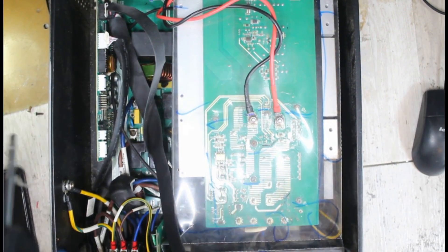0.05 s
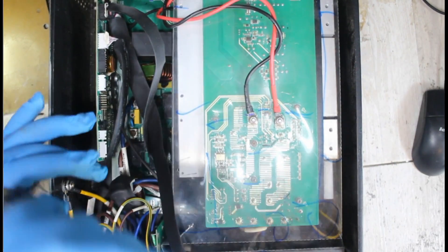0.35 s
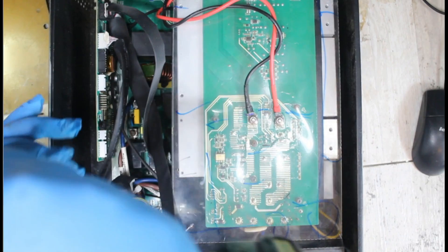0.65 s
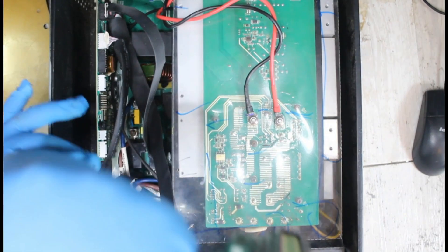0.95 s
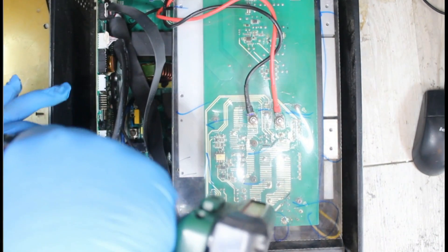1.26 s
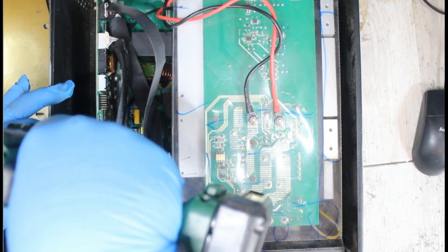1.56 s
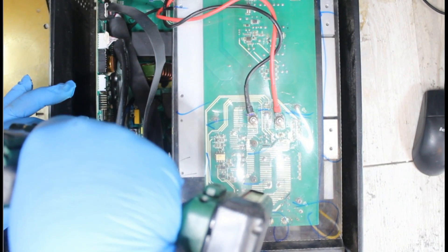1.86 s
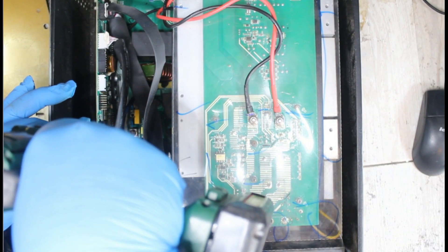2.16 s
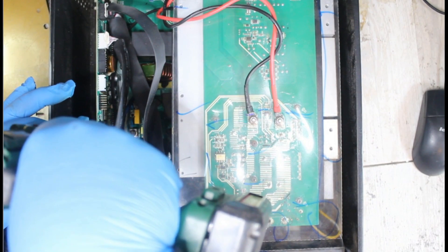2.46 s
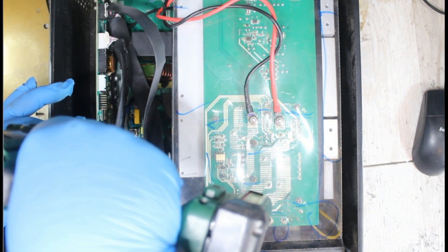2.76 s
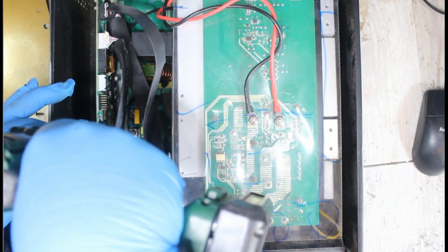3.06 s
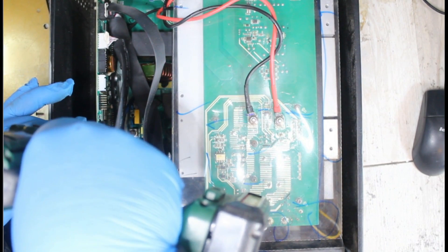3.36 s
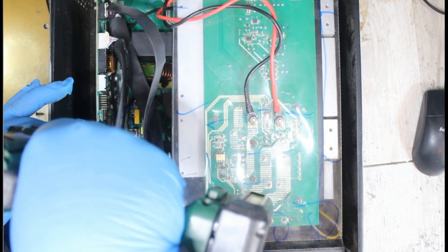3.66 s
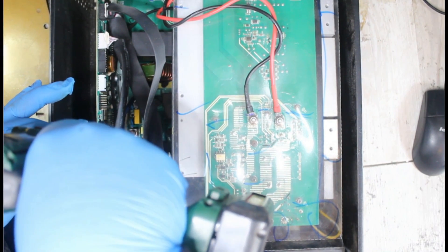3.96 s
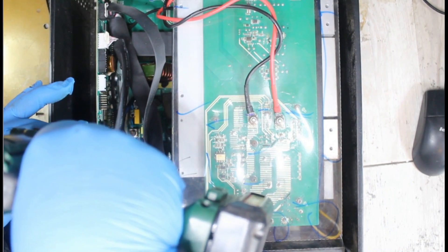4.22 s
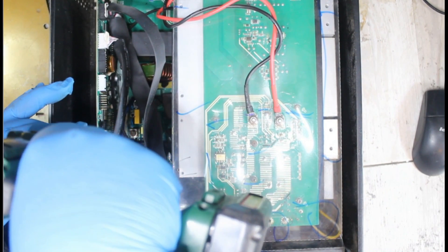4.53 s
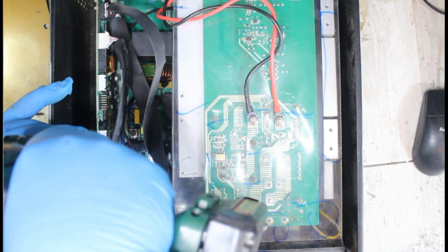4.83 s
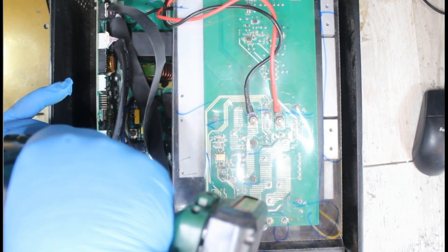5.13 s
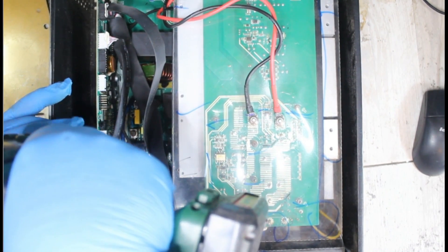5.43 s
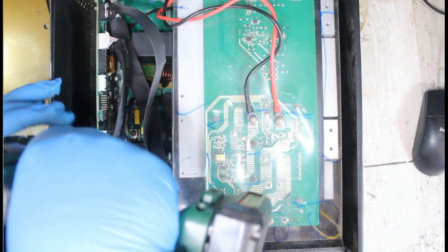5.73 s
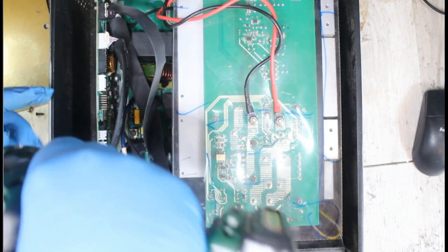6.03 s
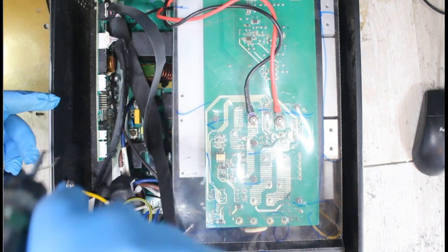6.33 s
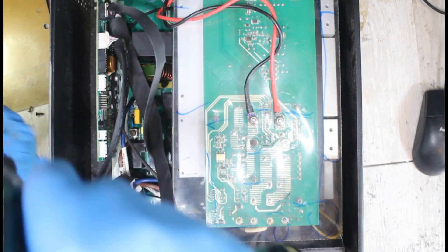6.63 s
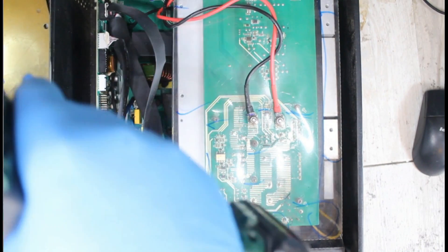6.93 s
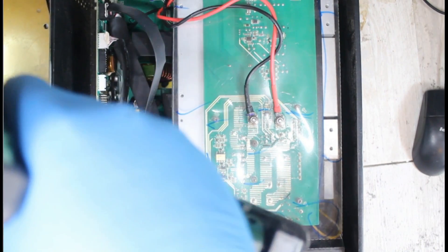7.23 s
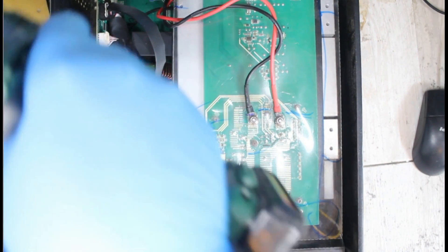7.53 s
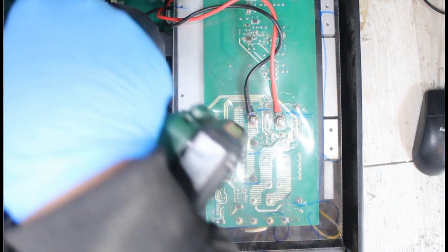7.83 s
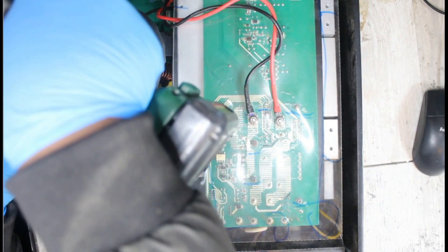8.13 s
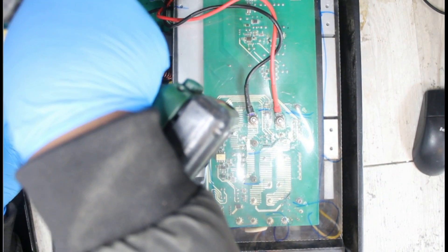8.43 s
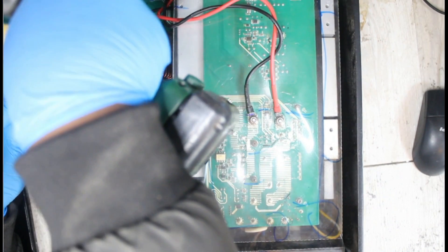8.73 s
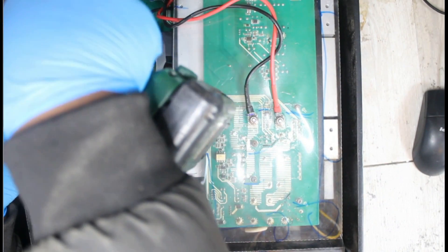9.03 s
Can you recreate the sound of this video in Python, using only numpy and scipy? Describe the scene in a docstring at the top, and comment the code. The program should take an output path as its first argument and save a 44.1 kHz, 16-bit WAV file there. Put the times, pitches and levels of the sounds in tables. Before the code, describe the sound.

A faint fan and mains hum fills a workshop, with a stereo microphone close above an open metal case. At about 0.3 seconds a cordless screwdriver thuds on the bench with sharp metallic clicks. Its bit taps and the case knocks between 1 and 1.8 seconds. The sound drops out briefly near 2.2, and more knocks come around 3.2 and 3.8. From 3.3 the stalled motor gives a faint, high whistle. At 4.6 a screw squeaks loose and the gears crawl, with a loud knock at 4.8. The motor races into a bright whirr at 4.9, the screw rattling, with a sharp click at 5.5, then brakes at 5.8. Light clicks and bumps follow. At 8.7 the motor crawls again, with sharp clicks and a squeak, speeding up just after 9 and whirring to the end.

```python
"""Workshop, faint hum; a small stereo microphone hangs close above an open metal case on the bench.
A cordless screwdriver bumps the bench, its bit clicks on screws and the case thumps; near 2.2 s the
sound drops out briefly. From 3.3 s a half-pressed trigger makes the stalled motor whistle. The screw
squeaks loose and rattles as the motor crawls, races up with a bright gear whirr and is braked.
A few light clicks and bumps follow, then a second pull at 8.7 s runs to the end."""
import sys
import numpy as np
from scipy import signal
from scipy.fft import rfft, irfft
from scipy.io import wavfile

SR = 44100
rng = np.random.default_rng(int(sys.argv[2]) if len(sys.argv) > 2 else 0)


def inscribe(sig):
    """Save sig as 16-bit PCM at rate SR to the path in sys.argv[1].

    A 1-D sig is mono; a 2-D sig holds one channel per row.
    Samples are clipped to [-1, 1] before scaling.
    """
    pcm = np.round(np.clip(np.atleast_2d(sig).T, -1, 1) * 32767)
    wavfile.write(sys.argv[1], SR, pcm.astype(np.int16))


N = 409248
T = np.arange(N) / SR
FREQS = np.fft.rfftfreq(N, 1 / SR)

# trigger pulls: (touched [s], screw loose [s], pressed home [s], eased off [s], gear take-up [s],
# gear level [dB], treble [dB], whistle dip [Hz])
TRIGGER_PULLS = [(3.265, 4.631, 4.918, 5.705, 0.075, -13, 2.5, 605),
                 (8.715, 8.742, 9.056, 9.6, 0.27, -11, 0.5, 516)]
# strong gear and commutator tones: (multiple of the shaft rate [-], boost at top speed [dB])
GEAR_TONES = [(1, 9), (3, 7), (6, 5), (9, 15), (12, 6), (16, 10), (18, 11), (19, 9), (26, 6), (28, 6),
              (30, 9), (31, 9), (33, 10), (35, 9), (37, 16), (38, 11), (39, 7), (43, 13), (45, 7)]
# gear housing response, then its treble band: (frequency [Hz], level [dB])
HOUSING_COLOUR = [(150, -22), (330, -8), (600, -3.5), (1100, -1), (1800, -1.5), (2800, 1), (4000, -4.5),
                  (5400, 2), (7800, -5), (10000, 0.5), (11500, 3), (13000, 5), (14100, 2), (15300, 3.5)]
TREBLE_BAND = [(3000, -40), (5500, -8), (10000, 0)]
# first three harmonics of the whistle: (stalled level [dB], loaded level [dB])
WHISTLE_HARMONICS = [(-6.5, 4), (-9.5, 2), (3, -7)]
# the loose screw catches in its hole: (time [s], level [dB])
SCREW_CATCHES = [(4.958, -23), (5.084, -28.5), (5.242, -29), (5.32, -27.5), (5.51, -17.5), (5.594, -20.5),
                 (5.68, -18), (5.735, -33), (5.806, -25), (9.09, -28.5)]
# the tight thread squeaks: (time [s], pitch [Hz], glide [Hz/s], level [dB])
THREAD_SQUEAKS = [(4.645, 3200, 14000, -30), (4.687, 3160, -5000, -23.5), (4.935, 3240, 0, -23.5),
                  (8.957, 2780, 2, -26)]
# blows on the case: (time [s], level [dB], thump offset [dB], tick offset [dB])
CASE_KNOCKS = [(0.2723, -10, -13.5, -13), (1.523, -22, -1.5, -16), (1.592, -25, -15, -10),
               (1.737, -24.5, -0.5, -26), (1.799, -12.5, -7, -16.5), (2.924, -31.5, 5, -31),
               (2.961, -32.5, -0.5, -17), (3.08, -28.5, -0.5, -43), (3.159, -29, 8.5, -33),
               (3.197, -9, -3.5, -15.5), (3.221, -16, 2.5, -11), (3.792, -14.5, -3.5, -17.5),
               (3.932, -27.5, 2, -32), (4.237, -27, -1, -17), (4.793, -3, -5, -3.5), (4.806, -13, -11, 0),
               (5.504, -11.5, -9, 2), (8.306, -30, 4, -28), (8.371, -34, -2, -26), (8.525, -33.5, 3.5, -18),
               (8.913, -17, -5, 0), (8.954, -16, -13, 4.5)]
# bit on screw: (time [s], level [dB], ring [Hz], ring offset [dB], body offset [dB], t60 [s])
BIT_CLICKS = [(0.236, -6.5, 13500, -1, -9, 0.059), (0.2441, 0.5, 11600, -4.5, -8, .02),
              (0.25, -9, 12100, 0, -4, 0.043), (0.274, -10, 13000, -7, -0.5, .03),
              (0.299, -3, 11840, -2, -7.5, 0.089), (0.456, -23, 4400, -1, -6, .013),
              (1.071, -23.5, 4550, 9, 0, 0.042), (2.634, -20.5, 2600, -9, 0, 0.031),
              (3.669, -36.5, 1460, -1, 6.5, .06), (4.633, -24, 2720, -1, -10, 0.063),
              (6.286, -45, 2400, 3, 12.5, 0.065), (7.191, -29.5, 1570, -7, 3, 0.089),
              (7.26, -26, 2470, -8, 2.5, 0.11), (7.647, -47, 2020, 3.5, 11, 0.45),
              (8.623, -42.5, 2520, 3.5, 3, .07), (8.735, -32, 3100, -9, -1, 0.088),
              (8.915, -15, 3340, 3, -2, 0.21), (8.953, -11, 2670, -2.5, -27, .074)]
# dull bumps on the bench: (time [s], level [dB], knock offset [dB])
BENCH_THUDS = [(.2505, -12.5, -6), (0.2569, -5.5, 7.5), (0.2677, -9.5, 1), (0.301, -21, -22),
               (0.45, -28.5, -18)]
# modes of the struck parts: (frequency [Hz], level [dB], t60 [s])
BRACKET_MODES = [(114, 0, 0.1), (206, -13.5, 0.25), (330, -9, 0.21), (373.4, 0.5, 0.11), (558, 4, 0.036),
                 (1140, -8, 0.043)]
PANEL_MODES = [(115.3, -4.5, 0.47), (133, -7, 0.2), (200.2, -10, .2), (369.3, -10.5, 0.12)]
FRAME_MODES = [(392, -0.5, 0.1), (558.5, 2.5, 0.14), (628, 3, 0.08), (766, -17, 0.03), (937, -13, 0.11),
               (1185, -6, 0.16), (1299, 4.5, 0.037), (1840, -29, .06), (2110, -9, 0.064),
               (2440, -26.5, .09), (2910, -8, 0.051), (3530, -34, 0.028)]
BENCH_MODES = [(31.2, -11, 1), (58.5, -10, 0.33), (115, -3.5, 0.22), (196, 1, 0.163), (250, -12.5, 0.054)]
BENCH_KNOCK_MODES = [(388, 0, .12), (420, -5, .07), (705, -17, .07), (1150, -14, .07), (1405, -14, .06)]
# loose parts, metal tick, panel rumble, room tail and room air: (frequency [Hz], level [dB])
RATTLE_COLOUR = [(150, -26.5), (400, 6.5), (1300, 5.5), (2400, -4.5), (4000, -4.5), (8000, -38),
                 (16000, -16)]
TICK_COLOUR = [(500, -28), (2000, 1.5), (4000, 3.5), (8000, 3.5), (12500, -2.5), (16000, -19)]
RUMBLE_COLOUR = [(30, 4), (80, 9), (130, 7.5), (220, 5.5), (300, -20), (600, -28)]
TAIL_COLOUR = [(150, -26), (700, 8.5), (5000, 4.5), (15000, 1.5)]
AIR_COLOUR = [(12, -56), (20, -7), (56, -5.5), (70, -5.5), (166, -14), (225, -16.5), (315, -18.5),
              (352, -20.5), (393, -8), (427, -15), (491, -13), (534, -24.5), (788, -22), (1540, -32.5),
              (15500, -36.5)]
# fan and mains hum: (frequency [Hz], level [dB])
HUM_TONES = [(48.4, -43), (161.5, -50.5), (199.2, -63.5), (387.6, -49), (473.7, -70), (780.6, -64),
             (947.5, -66.5)]
# how alike the microphone's two ports hear close work and room air: (frequency [Hz], likeness [0-1])
CLOSE_LIKENESS = [(100, .9), (400, 0.7), (900, 0.77), (2500, 1), (6000, 0.1), (14000, .05)]
ROOM_LIKENESS = [(100, 0.62), (400, 0.8), (900, 0.63), (2500, 0.081), (6000, 0.01), (14000, 0.028)]
# microphone balance: (frequency [Hz], left minus right [dB])
MIC_BALANCE = [(25, 17), (60, 8), (125, 6), (400, 1.5), (1000, 1.5), (2500, -0.5), (6000, -0.2),
               (13000, 2.5)]
# the sound drops out briefly: (time [s], level [dB])
LEVEL_DIP = [(2.15, -7), (2.2, -13.5), (2.24, -24), (2.26, -54), (2.3, -45), (2.318, -5)]

CRAWL_HZ, TOP_SPEED_HZ = 101, 345.9  # shaft rates
CHOP_HZ, SAG_HZ, LOAD_S, DIP_S = 3950, 238, .02, .039  # the trigger's current chopper
STALLED_DB, STALL_SWELL_DB, LOADED_DB, CHOP_FADE_DB_PER_S = -52, 6, -40, 497


def screwdriver(freeing_db_per_s=2, brake_after_s=.098, brake_db_per_s=442):
    """Close up: the stalled motor whistles, the gears grow louder as the screw frees, the brake bites."""
    out = np.zeros((2, N))
    for touched, loose, home, eased, take_up_s, db, treble_db, dip_hz in TRIGGER_PULLS:
        t = touched + np.arange(3 * SR) / SR
        freeing_db = freeing_db_per_s * np.maximum(t - home, 0)
        braking_db = brake_db_per_s * np.maximum(t - eased - brake_after_s, 0)
        drive = rise(t - loose, take_up_s) * undb(db + freeing_db - braking_db)
        whirr = gears(t, motor_speed(t, home, eased), treble_db)
        add(out, touched, drive * whirr + trigger_whistle(t, touched, loose, home, dip_hz))
    return out


def motor_speed(t, home, eased, race_s=.045, creep_s=.135, creep_share=.14, slowing_hz_per_s2=4000):
    """Turns per second: a crawl, a race, a last creep to top speed; eased off, it slows ever faster."""
    race = (1 - creep_share) * rise(t - home, race_s) + creep_share * rise(t - home, creep_s)
    slowing = slowing_hz_per_s2 * np.maximum(t - eased, 0) ** 2
    return CRAWL_HZ + np.maximum((TOP_SPEED_HZ - CRAWL_HZ) * race - slowing, 0)


def gears(t, hz, treble_db, louder_db_per_octave=3.5, brighter_db_per_octave=2.3):
    """Teeth sing and rattle in the housing, louder and brighter with each doubling of speed."""
    speed = hz / TOP_SPEED_HZ
    wobble = .00062 + .0132 * (1 - speed)  # a crawling motor turns less evenly
    turn = phase_of(hz * (1 + wobble * walk(140, t)))
    impacts = rng.standard_normal((2, len(t)))
    impacts *= undb(2.5 * np.repeat(rng.standard_normal(len(t) // 8 + 1), 8)[:len(t)])  # fine grain
    impacts *= (1 + .4 * np.sin(turn)) * undb(walk(60, t))  # stronger on one side of each turn
    whine = gear_whine(t, turn, speed)
    teeth = unit(colour(pair(impacts, CLOSE_LIKENESS), HOUSING_COLOUR))
    whirr = undb(-.5) * whine + undb(.14) * teeth
    octaves = np.log2(speed)
    treble_gain = undb(treble_db + brighter_db_per_octave * octaves)
    return undb(louder_db_per_octave * octaves) * (whirr + (treble_gain - 1) * colour(whirr, TREBLE_BAND))


def gear_whine(t, turn, speed, flutter_db=4, path_spread_rad=.27):
    """Multiples of the shaft rate fade in above half speed; near full speed some stand out."""
    on = speed > .4
    boost_db = dict(GEAR_TONES)
    tones, power = np.zeros((2, len(t))), 0
    for multiple in range(1, 48):
        gain = undb(boost_db.get(multiple, 0) * speed[on] ** 8)
        power = power + gain ** 2
        # each tone reaches the two ports by slightly different paths
        phase = 2 * np.pi * rng.random() + path_spread_rad * rng.standard_normal((2, 1))
        tones[:, on] += gain * undb(flutter_db * walk(24, t[on])) * np.sin(multiple * turn[on] + phase)
    tones[:, on] /= np.sqrt(power)
    tones = colour(tones, HOUSING_COLOUR)
    return tones / np.sqrt(np.mean(tones[:, on] ** 2)) * np.clip(2 * speed - 1, 0, 1)


def trigger_whistle(t, touched, loose, home, dip_hz, flutter_db=3):
    """Windings whistle at the chopping rate, sag and roughen under load, and fade with the trigger home."""
    load = rise(t - loose, LOAD_S)
    hz = CHOP_HZ - load * (SAG_HZ + dip_hz * (1 - rise(t - loose, DIP_S)))
    squeeze = np.sqrt(np.abs(np.sin(np.pi * np.clip((t - touched) / (loose - touched), 0, 1))))
    db = STALLED_DB + STALL_SWELL_DB * squeeze + load * (LOADED_DB - STALLED_DB)
    db -= CHOP_FADE_DB_PER_S * np.maximum(t - home, 0)
    jitter = .0003 + .025 * load
    phase = phase_of(hz * (1 + jitter * walk(700, t)))
    tone = 0
    for harmonic, (stalled_db, loaded_db) in enumerate(WHISTLE_HARMONICS, 1):
        shift_db = load * (loaded_db - stalled_db + flutter_db * walk(70, t))
        tone += undb(stalled_db + shift_db) * np.sin(harmonic * phase)
    return np.sqrt(2) * undb(db) * rise(t - touched, LOAD_S) * tone


def screw_rattle(rattle_db=-5, swell_s=.016, t60=.2):
    """The spinning screw skips on its thread and shakes its bracket each time it catches."""
    t = np.arange(SR // 4) / SR
    skips = rng.standard_normal(N) * (rng.random(N) < 500 / SR)  # about 500 a second
    bracket = unit(signal.fftconvolve(skips, ring(BRACKET_MODES, t))[:N])
    grip = sum(undb(db) * (1 - rise(at - T, swell_s)) * fade(np.clip(T - at, 0, 1), t60)
               for at, db in SCREW_CATCHES)
    return (bracket + undb(rattle_db) * noise(RATTLE_COLOUR, N)) * grip


def thread_squeaks(width_s=.0096, jitter=.019):
    """The thread sticks and slips in a short, rough chirp."""
    out, t = np.zeros((2, N)), np.arange(-SR // 20, SR // 20) / SR
    for at, hz, glide, db in THREAD_SQUEAKS:
        phase = phase_of((hz + glide * t) * (1 + jitter * walk(592, t - t[0])))
        add(out, at + t[0], np.sqrt(2) * undb(db) * np.exp(-(t / width_s) ** 2) * np.sin(phase))
    return out


def case_knocks(contact_s=.00077, swell_s=.0076):
    """The tool bumps the case: a tick, the frame clacks, loose parts rattle, the wide panel thumps."""
    out, t = np.zeros((2, N)), np.arange(SR // 2) / SR
    swell = rise(t, swell_s)
    for start, db, thump_db, tick_db in CASE_KNOCKS:
        contact = rise(t, contact_s * 2 ** (-tick_db / 9.5))  # less tick: a softer, longer contact
        rumble = peak(noise(RUMBLE_COLOUR, len(t)) * fade(t, t60=.45) * swell)
        thump = peak(ring(PANEL_MODES, t, detune=.023) * swell) + undb(-7) * rumble
        clack = peak(ring(FRAME_MODES, t) * contact)
        rattle = peak(noise(RATTLE_COLOUR, len(t)) * fade(t, t60=.091) * contact)
        tick = peak(noise(TICK_COLOUR, len(t)) * fade(t, t60=.097))
        blow = undb(thump_db + 3) * thump + undb(-2) * clack + undb(-1) * rattle + undb(tick_db + 4) * tick
        add(out, start, undb(db) * blow)
    return out


def bit_clicks(contact_s=.00077, gain_db=2):
    """Metal touches metal: a bright snap, one short resonance, a little of the case and a brief tail."""
    out, t = np.zeros((2, N)), np.arange(SR // 4) / SR
    snap, tail = undb(3) * fade(t, t60=.014), undb(-24) * fade(t, t60=.22)
    for start, db, hz, ring_db, body_db, t60 in BIT_CLICKS:
        resonance = [(hz / 2, -40), (hz * .86, -14), (hz, 0), (hz * 1.14, -14), (hz * 2, -40)]
        envelope = (snap + fade(t, t60) + tail) * rise(t, contact_s)
        for spectrum, part_db in ((TICK_COLOUR, 0), (resonance, ring_db), (RATTLE_COLOUR, body_db)):
            add(out, start, undb(db + part_db + gain_db) * peak(noise(spectrum, len(t)) * envelope))
    return out


def bench_thuds(contact_s=.0012):
    """The tool is picked up and bumps the bench, which answers low and dies quickly."""
    out, t = np.zeros((2, N)), np.arange(SR // 2) / SR
    for start, db, knock_db in BENCH_THUDS:
        knock = undb(knock_db - 5) * peak(ring(BENCH_KNOCK_MODES, t))
        boom = peak(ring(BENCH_MODES, t))
        add(out, start, undb(db) * (boom + knock) * rise(t, contact_s))
    return out


def room_reflections(direct, wet_db=-15, t60=.22):
    """Bench and walls return a short diffuse tail, 4 ms behind the direct sound."""
    t = np.arange(SR // 3) / SR
    tail = rng.standard_normal((2, len(t))) * fade(t, t60) * (t > .004)
    tail = colour(tail / np.sqrt(np.sum(tail[0] ** 2)), TAIL_COLOUR)
    return direct + undb(wet_db) * signal.fftconvolve(direct, tail, axes=1)[:, :N]


def room_tone(air_db=-39, hum_db=2.5, waver_db=2, drift=.00393):
    """Behind the work, a fan and mains equipment hum over soft room noise."""
    air = noise(AIR_COLOUR, N, ROOM_LIKENESS) * undb(air_db + .11 * walk(5.8))
    hum = sum(undb(db + waver_db * walk(7)) * np.sin(phase_of(hz * (1 + drift * walk(9))))
              for hz, db in HUM_TONES)
    return air + np.sqrt(2) * undb(hum_db) * hum


def ring(modes, t, detune=.0084):
    """Decaying modes; each blow lands elsewhere, so their levels and pitches vary a little."""
    chance = rng.standard_normal((len(modes), 3))
    return sum(undb(db + shift_db) * fade(t, t60) * np.sin(2 * np.pi * (hz * (1 + detune * bend) * t + phase))
               for (hz, db, t60), (shift_db, bend, phase) in zip(modes, chance))


def noise(spectrum, size, likeness=CLOSE_LIKENESS):
    """Coloured stereo noise of rms 1."""
    return unit(colour(pair(rng.standard_normal((2, size)), likeness), spectrum))


def pair(x, likeness):
    """Blend two unrelated channels so that the ports agree in the bass and less in the treble."""
    n = x.shape[-1]
    alike = across(likeness, np.fft.rfftfreq(n, 1 / SR))
    mid, side = rfft(x) * np.sqrt([1 + alike, 1 - alike])
    return irfft(np.array([mid + side, mid - side]), n)


def colour(x, spectrum):
    """Filter by (frequency [Hz], level [dB]) points."""
    n = x.shape[-1]
    return irfft(rfft(x) * undb(across(spectrum, np.fft.rfftfreq(n, 1 / SR))), n)


def across(points, freqs):
    """A table joined by straight lines over log frequency."""
    hz, value = np.transpose(points)
    return np.interp(np.log(freqs + 1), np.log(hz), value)


def walk(rate_hz, t=T):
    """Random wandering with a spread near 1."""
    knots = rng.standard_normal(8192)
    return 1.213 * np.interp(t * rate_hz, np.arange(len(knots)), knots)


def phase_of(hz):
    """Running phase in radians."""
    return 2 * np.pi * np.cumsum(hz) / SR


def rise(t, seconds):
    """Settle from 0 towards 1 once t passes zero."""
    return 1 - np.exp(-np.maximum(t, 0) / seconds)


def fade(t, t60):
    """Exponential decay, 60 dB down after t60."""
    return np.exp(-np.log(1000) * t / t60)


def undb(db):
    """Decibels to gain."""
    return 10 ** (np.asarray(db) / 20)


def unit(x):
    """Scale to rms 1."""
    return x / np.sqrt(np.mean(x ** 2))


def peak(x):
    """Scale to peak 1."""
    return x / np.abs(x).max()


def add(out, start, x):
    """Mix a sound in at a time."""
    i = int(start * SR)
    out[:, i:i + x.shape[-1]] += x[..., :N - i]


def scene(lag_s=5.5e-5, max_lag_rad=1.94):
    """The tool works slightly right of the microphone, so it reaches the left port a little later."""
    contacts = bench_thuds() + case_knocks() + bit_clicks()
    left, right = contacts + screwdriver() + screw_rattle() + thread_squeaks()
    lag_rad = np.minimum(2 * np.pi * FREQS * lag_s, max_lag_rad)
    left = irfft(rfft(left) * np.exp(-1j * lag_rad), N)
    return room_reflections(np.array([left, right])) + room_tone()


def record(dry, clip_at=.85, top_hz=15780):
    """The sound drops out once; the left port hears more bass; peaks clip; the top is cut steeply."""
    dipped = dry * undb(np.interp(T, *np.transpose(LEVEL_DIP)))
    lean_db = across(MIC_BALANCE, FREQS) / 2
    ports = irfft(rfft(dipped) * undb([lean_db, -lean_db]), N)
    top_db = np.interp(FREQS, [top_hz, top_hz + 500], [0, -70])
    return irfft(rfft(np.clip(ports, -clip_at, clip_at)) * undb(top_db), N)


dry = scene()
out = record(dry)
inscribe(out)
```